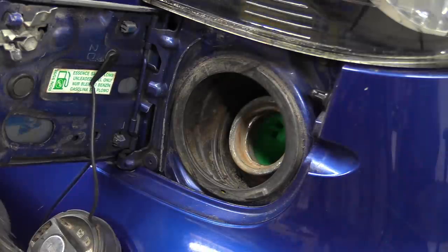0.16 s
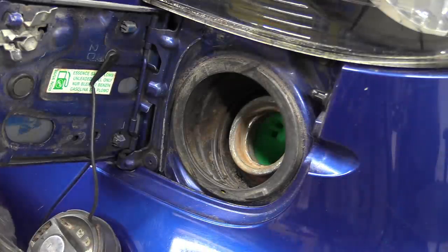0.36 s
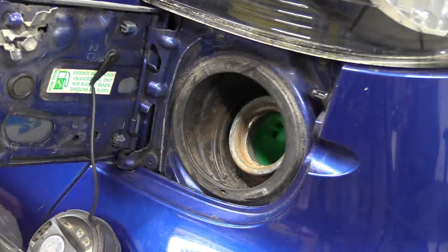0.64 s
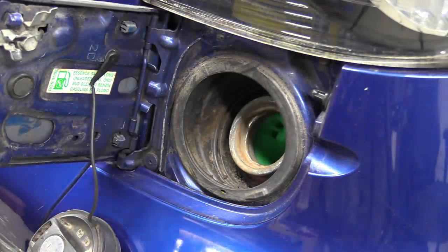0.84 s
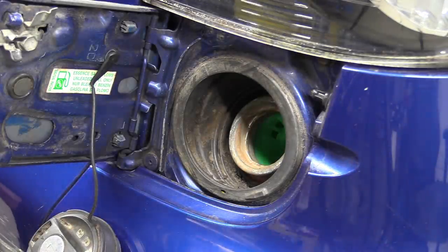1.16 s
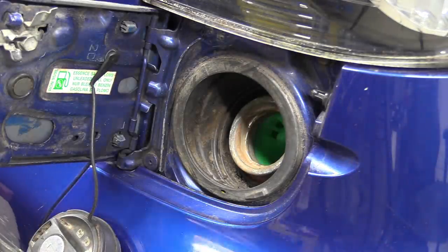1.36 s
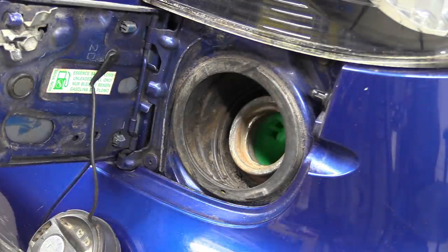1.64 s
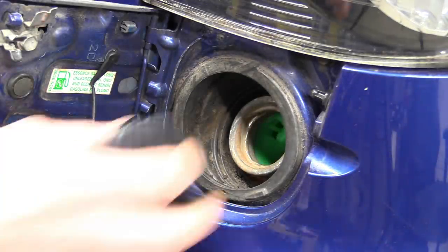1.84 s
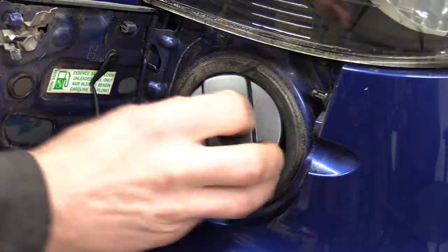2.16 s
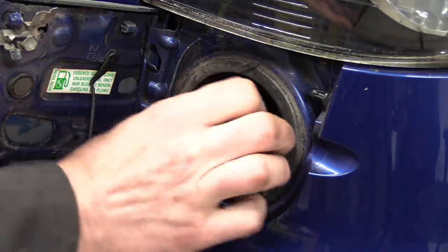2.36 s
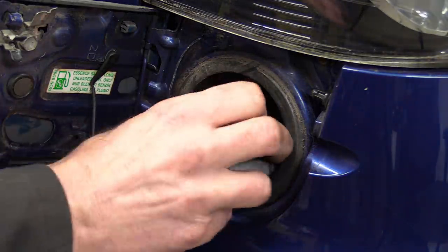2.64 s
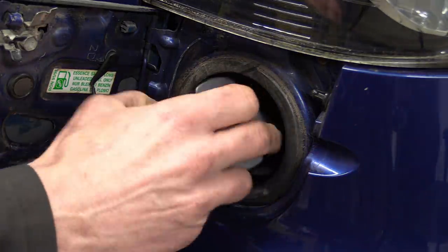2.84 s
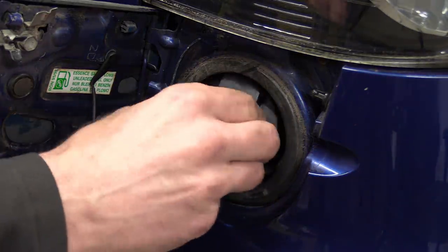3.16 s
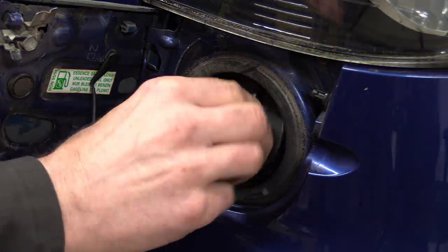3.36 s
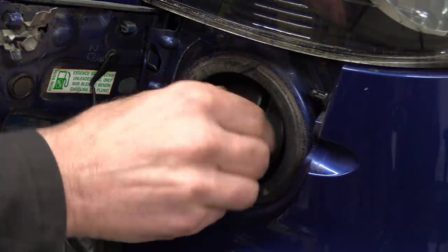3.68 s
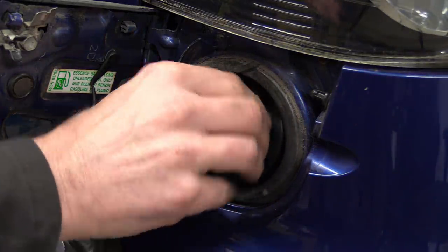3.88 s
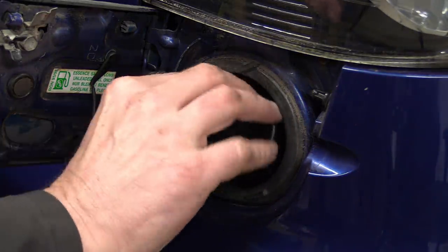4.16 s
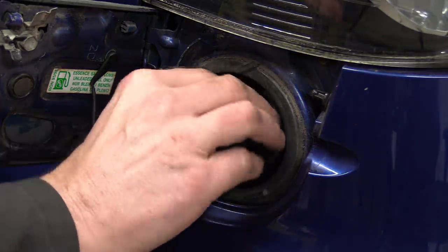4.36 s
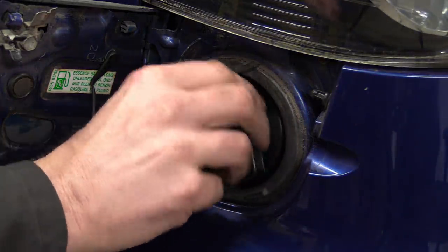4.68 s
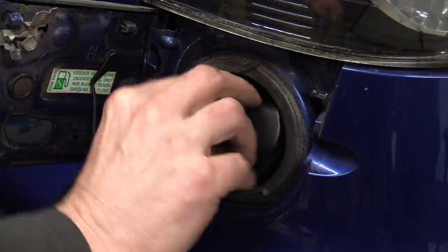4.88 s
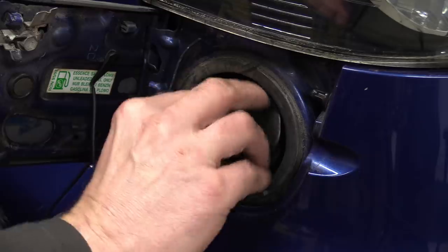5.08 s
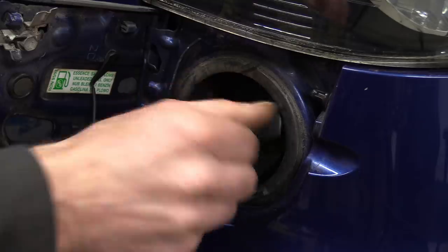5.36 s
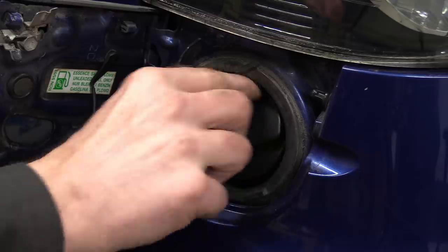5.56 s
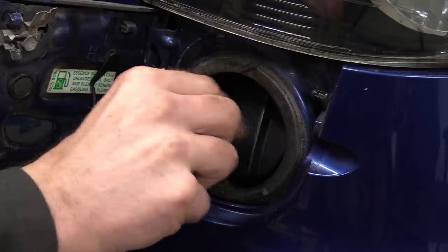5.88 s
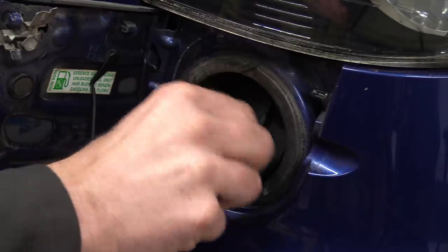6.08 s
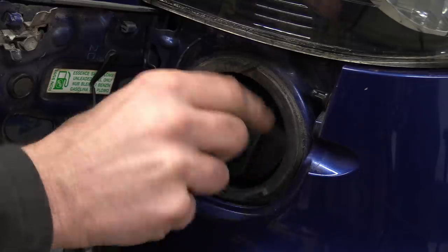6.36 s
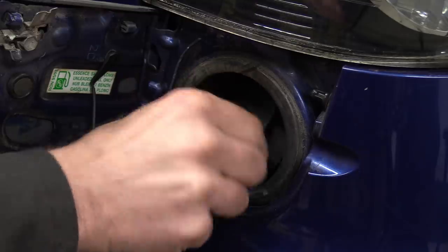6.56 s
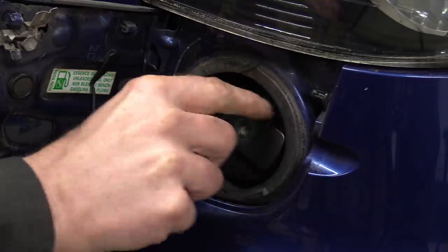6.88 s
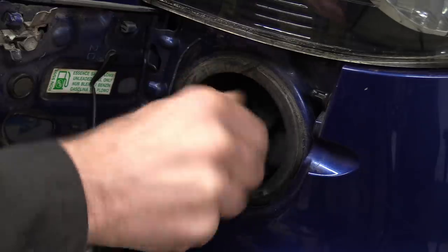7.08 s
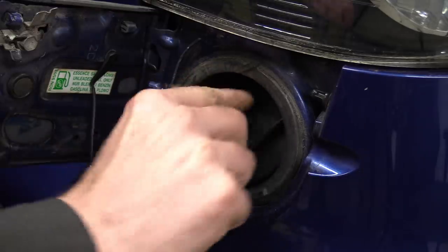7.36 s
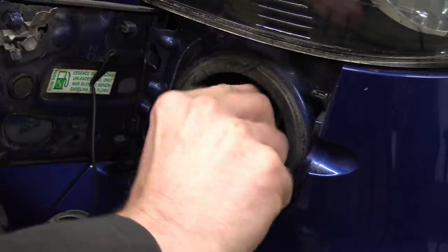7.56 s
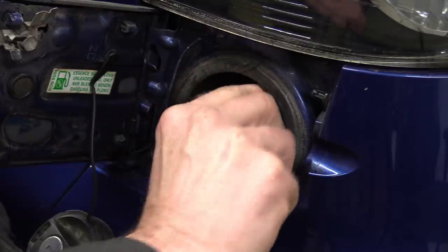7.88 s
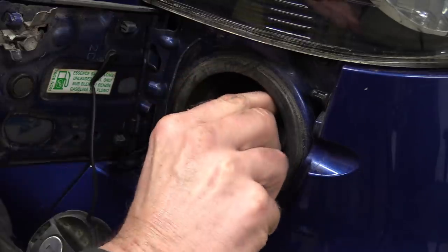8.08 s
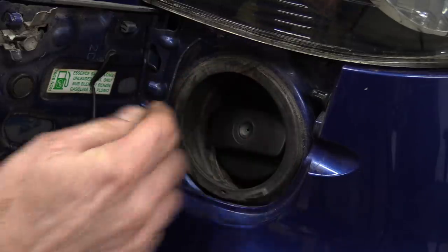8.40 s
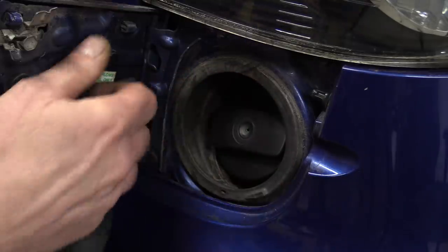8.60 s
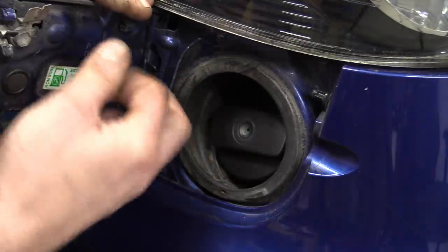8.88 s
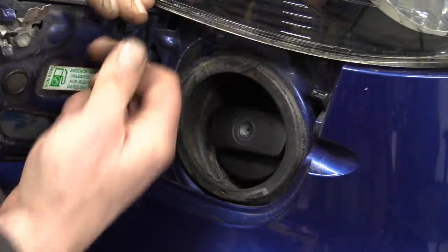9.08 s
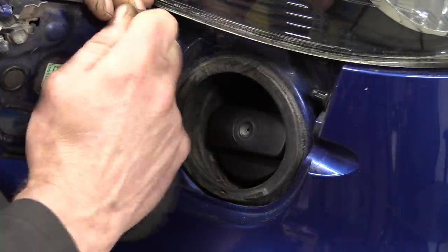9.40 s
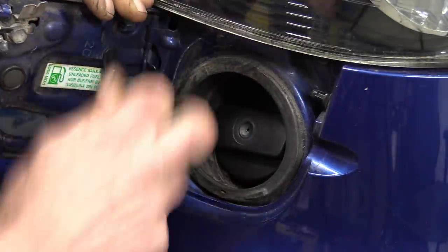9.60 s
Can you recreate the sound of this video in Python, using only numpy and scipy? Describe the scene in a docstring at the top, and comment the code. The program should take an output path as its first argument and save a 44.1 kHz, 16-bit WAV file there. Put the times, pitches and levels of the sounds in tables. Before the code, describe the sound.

In an echoing garage, an object clatters across the room, then a plastic cap knocks, grates and turns in a car's filler neck, ending with latch snaps.

```python
"""Fuel cap in a bare garage

Close to the microphone, a hand sets a plastic cap into a car's filler neck and turns it in several grips:
blows ring decaying modes, and thread and fingers rub as trains of tiny slips through surface colours.
The hand also bumps flap and body panel, the latch snaps, a sleeve swishes over the scene.
A few metres off, a hard object clatters early on, then slides, scuffs and squeaks as it settles.
Every source is heard directly and through synthetic room echoes, over quiet room noise.
"""
import sys
import numpy as np
from scipy import signal
from scipy.fft import rfft, irfft
from scipy.io import wavfile
from scipy.ndimage import uniform_filter1d, map_coordinates

SR = 44100
rng = np.random.default_rng(int(sys.argv[2]) if len(sys.argv) > 2 else 0)


def materialize(psi):
    """Save the field psi as 16-bit PCM at rate SR to the path in sys.argv[1].

    A 1-D psi becomes a single channel; in a 2-D psi each row is a channel.
    """
    bounded = np.clip(np.atleast_2d(psi).T, -1, 1)
    quanta = np.round(bounded * 32767).astype(np.int16)
    wavfile.write(sys.argv[1], SR, quanta)


N = 429534
TIME = np.arange(N) / SR

# All levels in the tables are relative: each source sets its own balance on top.
# Mode pitches and levels of cap, flap, latch and far object are nominal: each blow varies them;
# panel and room modes stay fixed.
THREAD_CATCHES_S = 3.8
GRIP_HISS_DB = -67.5  # the fingers creep a little during every turn
QUICKENING = 0.72  # a harder contact is over sooner (dB of contact time per dB of hardness)
AIR_DB = -65
TOP_HZ = 15750

# Five parts of every blow, thud, body, clack, ring and tick: low_hz, high_hz
BLOW_PARTS = [(60, 600), (600, 1850), (1850, 2750), (2750, 4500), (4500, 16000)]

# The cap knocks in the neck; a blow on its rim rings higher: start_s, level_db, hardness_db, rim_ring_db
CAP_KNOCKS = [(2.399, -26, -4, 0.5), (3.306, -30.5, -6, 2), (3.402, -36, -8.5, 2), (3.432, -39.5, 0, 0),
              (3.449, -36.5, 4.5, -10), (3.668, -41.5, 9, 4.5), (3.929, -45.5, 5, 2),
              (4.045, -41.5, 1.5, 7), (4.354, -50.5, -10, 0), (4.469, -30.5, -3.5, 1.5),
              (4.767, -47, 2.5, 3), (4.817, -46.5, 0, 7), (4.841, -48, 0, 3), (4.891, -37.5, -3, -3),
              (4.907, -51, -7, -3), (5.013, -24, -2, 5), (5.024, -38.5, -5, -12), (5.209, -42, 1, 2),
              (5.363, -29, 3.5, -5), (5.415, -37, -0.5, -7), (5.627, -26.5, 1, -0.5),
              (5.717, -25.5, 12, -3), (5.766, -20.5, 3.5, 4.5), (5.771, -31.5, 11.5, -9),
              (5.993, -47.5, 5, 7), (6.099, -43.5, -3, -2), (6.126, -26.5, 5, 1), (6.135, -30, 7, -11),
              (6.226, -21, 9.5, -1.5), (6.563, -32, 5.5, -6), (6.616, -25.5, 5.5, -5),
              (6.623, -36.5, 16, -8), (6.7, -29.5, 16.5, 2), (6.706, -32, 0.5, -17), (7.029, -36, 9, -12),
              (7.056, -36.5, 4, -4), (7.095, -43, 2, 3)]
# What the cap rings with: pitch_hz, level_db, t60_s
CAP_MODES = [(298, 1, 0.038), (374, -1.5, 0.1), (538, 5, 0.036), (739, -11.5, 0.02), (849, -3, 0.033),
             (956, 0, 0.019), (1014, 3.5, 0.013), (1270, -7.5, 0.0096), (1996, 14.5, 0.021),
             (2175, 19.5, 0.012), (2332, 9.5, 0.04), (2630, 4, 0.018), (3072, 6.5, 0.042),
             (4400, -10, 0.013), (6150, 8, 0.0073), (7140, -1, 0.01)]
# Crack of a blow on the cap: frequency_hz, density_db (per Hz)
CAP_CRACK = [(60, -35), (150, 0), (400, -1.5), (600, 3.5), (950, 22), (1600, 16), (2400, 3), (3300, -9.5),
             (5000, -17), (7400, -17.5), (9500, -24.5), (15000, -41.5)]
# The hand turns the cap, a stroke at a time: start_s, end_s, pressure_db
CAP_TURNS = [(2.677, 2.905, -54.5), (3.004, 3.05, -48), (3.169, 3.174, -48), (3.358, 3.482, -36.5),
             (3.592, 3.693, -43.5), (3.929, 3.963, -41.5), (3.999, 4.076, -42), (4.198, 4.212, -39.5),
             (4.336, 4.409, -47.5), (4.512, 4.556, -42.5), (4.885, 4.902, -29.5), (4.903, 4.976, -48),
             (4.997, 5.003, -33.5), (5.102, 5.257, -44.5), (5.241, 5.335, -38), (5.69, 5.784, -35.5),
             (6.149, 6.225, -37.5), (6.643, 6.717, -38), (7.019, 7.127, -46.5), (7.107, 7.25, -57.5)]
# The deeper the cap sits in its thread, the more a turn grates: time_s, grit_db (over the pressure)
GRATING = [(2.6, -28), (3.5, -18), (5.3, -8), (5.7, -4), (7.1, -0.5)]
# The fingers slide to a new grip: start_s, end_s, level_db
REGRIPS = [(2.08, 2.28, -65), (2.29, 2.36, -57), (2.378, 2.41, -46.5), (2.67, 2.87, -60.5),
           (2.94, 3.0, -63.5), (3.03, 3.18, -74), (3.83, 3.89, -66.5), (3.998, 4.025, -56.5),
           (4.42, 4.48, -67), (4.65, 4.76, -67.5), (5.255, 5.305, -48), (5.33, 5.41, -64),
           (6.578, 6.612, -50)]
# Dry fingertips chatter on the grip, at varied pitches: start_s, end_s, level_db, pitch_hz
FINGER_SQUEAKS = [(2.382, 2.398, -51, 1520), (2.385, 2.398, -46, 3030), (2.68, 2.87, -73, 6100),
                  (2.945, 3.0, -72, 7100), (3.14, 3.2, -79, 7100), (3.6, 3.66, -76, 7300),
                  (3.835, 3.89, -63.5, 6800), (3.998, 4.022, -47, 2000), (4.42, 4.47, -77, 7500),
                  (4.57, 4.61, -61, 3150), (4.68, 4.76, -73, 7200), (4.885, 4.903, -55.5, 5960),
                  (5.262, 5.3, -63.5, 7300), (6.113, 6.123, -60, 7100), (6.15, 6.22, -74, 7300),
                  (6.583, 6.609, -49.5, 7300), (6.64, 6.69, -83, 7450), (6.94, 6.98, -75, 8200),
                  (7.13, 7.19, -75.5, 6700)]
# Colour of the rubbing thread: frequency_hz, density_db (per Hz)
RUB_COLOUR = [(100, -21), (170, -4), (350, -2), (650, -8.5), (860, 12.5), (1020, -1), (1250, -3),
              (1600, -24.5), (2200, -34)]
# Colour of grit in the thread and under the fingers: frequency_hz, density_db (per Hz)
GRIT_COLOUR = [(780, -2), (960, 14), (1200, -0.5), (1650, 3), (1950, 6), (2150, 4), (2400, 10.5),
               (2750, -17), (3030, 3.5), (3300, -10.5), (4400, -10), (5200, -19), (7300, -16), (8600, -24),
               (11000, -27), (15000, -50)]
# Colour of fingers or any light, dry scrape: frequency_hz, density_db (per Hz)
DRY_SCRAPE_COLOUR = [(2500, -12), (3080, 16), (3800, -10), (4800, -8), (5900, 2.5), (7400, -1),
                     (9500, -7.5), (12500, -12), (15000, -30)]

# Hand and cap bump the filler housing and flap; skin is soft, nail and plastic are hard, and the middle
# of the flap sounds hollow, its rim does not: start_s, level_db, hardness_db, hollowness_db
FLAP_KNOCKS = [(2.073, -48.5, 2.5, -4.5), (2.148, -55.5, 11, 1), (2.192, -50, 3, -3.5),
               (2.21, -51, -12, 8.5), (2.245, -55, 6, -3.5), (2.675, -62, 14, -11.5), (2.885, -57, 4, -8.5),
               (6.476, -51, -5, -0.5), (7.203, -51, 0, 2), (7.467, -54, -3, 2.5), (7.496, -52.5, -11, 5),
               (7.684, -50, -1, 1), (7.863, -52, 22, -4.5), (8.588, -44.5, -4, -2.5), (8.658, -49.5, -4, 2),
               (8.955, -46, 11, 11), (9.018, -36, 6.5, 1), (9.21, -41.5, -1, -0.5), (9.222, -51, 12, 10),
               (9.246, -29, 0, -2), (9.27, -34.5, 0, 0), (9.292, -44, 3, -10), (9.334, -27.5, 2, 7),
               (9.461, -35.5, 0.5, 2), (9.491, -34.5, -3.5, 0), (9.607, -31, -7.5, 3.5), (9.667, -46, 9, 4),
               (9.683, -50, -1, 7)]
# What housing and flap ring with: pitch_hz, level_db, t60_s
FLAP_MODES = [(68, -46, 0.22), (159, -3.5, 0.063), (243, 1.5, 0.06), (398, 0.5, 0.054), (560, 6.5, 0.03),
              (720, -1, 0.0061), (950, 8, 0.018), (1380, 3, 0.026), (1620, 11, 0.025), (1718, 13.5, 0.019),
              (2125, 10, 0.023), (2955, -7, 0.02), (3700, 4, 0.011), (4525, -5, 0.023), (6270, 5, 0.012),
              (10650, 10, 0.0028)]
# Crack of flap, latch and dirt specks: frequency_hz, density_db (per Hz)
CRACK_COLOUR = [(60, -26), (150, 4.5), (400, 15), (1000, 20.5), (2500, 4), (3900, 1.5), (5000, -6.5),
                (7800, -8.5), (11000, -22), (15000, -33)]
# The flap's latch snaps and rebounds: start_s, level_db, hardness_db
LATCH_CLICKS = [(8.8965, -21.5, 0.5), (8.903, -35, -5.5), (8.9085, -49, -5), (8.913, -48, 6),
                (9.599, -26.5, 4.5), (9.612, -43, 2)]
# What the latch rings with: pitch_hz, level_db, t60_s
LATCH_MODES = [(220, -1.5, 0.039), (422, -12, 0.027), (660, -1, 0.014), (970, -1, 0.016), (1525, 2, 0.022),
               (2080, 0, 0.013), (2890, -7, 0.012), (3350, 15, 0.016), (3980, 11, 0.015), (5970, 0, 0.013),
               (7340, 3, 0.0085), (8440, -3, .01), (11280, -11, .01)]

# The soft side of the hand thumps the body panel: start_s, level_db
PANEL_THUMPS = [(2.075, -38.5), (2.194, -41), (2.221, -42), (6.477, -41), (8.26, -43), (6.935, -46.5),
                (8.575, -48), (8.697, -33), (8.718, -34), (9.025, -34), (9.24, -23.5), (9.268, -26.5)]
# What the panel rings with: pitch_hz, level_db, t60_s
PANEL_MODES = [(70, -24, 0.061), (158, -4.5, 0.053), (212.4, 11, 0.051), (366, -2.5, 0.059)]
# The hand leans and drags on the bodywork: start_s, end_s, level_db
PANEL_DRAGS = [(2.14, 2.28, -41), (2.42, 2.57, -46), (2.62, 3.15, -54), (4.88, 4.98, -39), (8.57, 8.8, -41),
               (8.93, 9.08, -35.5), (9.235, 9.305, -27), (9.36, 9.72, -42.5)]
# Colour of skin on the panel: frequency_hz, density_db (per Hz)
PANEL_COLOUR = [(35, -41), (68, -13), (95, -34), (150, 2.5), (220, 2), (380, -5), (600, -16), (1500, -16),
                (3000, -22.5)]

# The sleeve swishes with each move of the arm: start_s, end_s, level_db
SLEEVE_SWISHES = [(0, 0.3, -58), (1.45, 1.9, -59), (7.44, 7.88, -62.5), (8.27, 8.44, -50.5),
                  (8.57, 8.76, -57.5), (8.8, 8.89, -59.5), (9.19, 9.27, -44), (9.55, 9.74, -50.5)]
# Colour of sliding cloth: frequency_hz, density_db (per Hz)
CLOTH_COLOUR = [(200, -3), (600, 4), (1200, 5), (2000, 10.5), (3700, 4), (5000, -4.5), (7500, -3.5),
                (10000, -9), (15000, -21)]

# A hard object clatters across the room and settles: start_s, level_db, hardness_db
FAR_KNOCKS = [(0.719, -17.5, 4), (0.73, -29, -1), (0.742, -29, 5), (0.762, -21.5, -2.5), (0.782, -26, 5.5),
              (0.879, -29, 0), (0.908, -31.5, -6), (1.128, -43, -14), (1.153, -50, -10), (1.18, -62, -12)]
# What the far object rings with: pitch_hz, level_db, t60_s
FAR_MODES = [(300, 4.5, 0.11), (494, 15, 0.059), (810, 7, 0.027), (1100, 4.6, 0.03), (1370, 11, 0.053),
             (1720, 13, 0.065), (2165, 32, 0.036), (2450, 5.9, 0.05), (2700, 8.2, 0.058),
             (3260, 5.2, 0.053), (5330, 3, 0.031), (7300, 8.5, 0.055), (7800, 5.6, 0.058)]
# Colour of its cracks and slides: frequency_hz, density_db (per Hz)
FAR_CRACK = [(70, -39), (130, -26), (300, -7), (450, -7), (750, -4.5), (1100, -2.5), (2300, -2.5),
             (3200, -10), (4200, -18), (5200, -15), (7900, -8.5), (10000, -21), (15500, -42)]
# It slides a little: start_s, end_s, level_db
FAR_SLIDES = [(.875, .93, -43), (1.097, 1.185, -54.5), (1.29, 1.36, -65), (1.47, 1.62, -61.5),
              (1.72, 1.88, -64)]
# Its underside scuffs the floor as it comes to rest: start_s, end_s, level_db
FAR_SCUFFS = [(1.135, 1.19, -51.5), (1.205, 1.245, -54)]
# Colour of that scuff: frequency_hz, density_db (per Hz)
SCUFF_COLOUR = [(140, -7), (230, -4), (330, -7), (580, 0), (850, 5.5), (1150, -15)]
# It squeaks as it settles: start_s, end_s, level_db, pitch_hz
FAR_SQUEAKS = [(1.095, 1.122, -41, 2950), (1.128, 1.16, -47, 2310), (1.315, 1.345, -58, 2890),
               (1.325, 1.355, -58, 2460), (1.475, 1.505, -62, 3020), (1.485, 1.512, -56, 1420),
               (1.76, 1.86, -62, 3040)]

# The garage's echo: frequency_hz, t60_s, level_db, left_right_likeness (0-1), left_over_right_db
ROOM_ECHO = [(58.4, 3.7, 24, 0.93, 0.5), (112, 2.2, -1.5, 1, -12), (138, 1.8, 4.5, 1, -3),
             (345, 1.02, 7, 0.94, -5), (600, 0.87, 3, 0.53, -3), (916, 0.56, -2.5, 0.34, 0),
             (2160, 0.67, 0, 0.35, -2), (2830, 0.48, -2, 0.76, -3), (3580, 0.72, -0.5, 0, -2),
             (5000, 0.67, -2.5, 0, -4), (8100, 0.31, -1.5, 0.6, -2), (15100, 0.39, -2, 0.6, -3)]
# Its standing waves: pitch_hz, level_db, t60_s
ROOM_MODES = [(150.7, -49.5, 0.86), (225, -61, 0.6), (372.5, -48.5, 0.41), (408.2, -50.5, 0.68),
              (577.7, -60.5, 0.5), (820, -59.5, 0.32), (897, -60.5, 0.15), (959, -58.5, 0.34),
              (1086, -55, 0.29)]
# Colour of the room noise: frequency_hz, density_db (per Hz)
AIR_COLOUR = [(15, -33), (25, -21), (153, 5.5), (575, 1), (1290, 0), (1440, 0), (1610, -3.5), (1840, -6),
              (2000, 1.5), (3720, -6), (4030, -8), (6380, -11.5), (9070, -13), (9840, -14.5), (16000, -25)]


def cap():
    """The cap knocks in the neck; each turn rubs and grates the thread, and the fingers slide on the grip."""
    blows = knocks(
        CAP_KNOCKS, CAP_MODES, CAP_CRACK, trims_db=[-16.0, 0.5, -11.5, -19, -27.5],
        tilts=[(-1.48, -0.27), (-0.29, -0.083), (0.65, -0.23), (0.49, 0.93), (-0.15, 0.13)],
        cracks_db=[2.0, -6.5, -3.5, -5, 1.0], crack_t60=0.036, rise_s=0.0023, detune=0.029,
        stiffen_per_s=0.012)
    blows = low_cut(blows, hz=105.5, order=4)

    # once the thread has caught, the cap slides for a moment before it strikes
    slides_in = [(s - .012, s, db) for s, db, *_ in CAP_KNOCKS if s > THREAD_CATCHES_S]
    run_up = strokes(slides_in, edge_s=0.0042)
    thread = friction(RUB_COLOUR, slips_per_s=2000, spread_db=1.5, flutter_db=3.0)
    thread = wander(thread, share=0.05, size=1200)
    rub = thread * (strokes(CAP_TURNS, edge_s=0.02) + undb(-14.5) * run_up)

    regripping = strokes(REGRIPS, edge_s=0.063)
    grating = strokes(CAP_TURNS, edge_s=0.018) * undb(np.interp(TIME, *np.transpose(GRATING)))
    grains = friction(GRIT_COLOUR, slips_per_s=2200, spread_db=2, flutter_db=2.5)
    grains = wander(grains, share=0.06, size=900)
    grit = grains * (grating + undb(1.5) * regripping)

    skin = friction(DRY_SCRAPE_COLOUR, slips_per_s=3000, spread_db=3, flutter_db=3)
    creeping = strokes([(start, end, GRIP_HISS_DB) for start, end, _ in CAP_TURNS], edge_s=0.012)
    finger_motion = np.maximum(regripping, creeping)
    # specks of dirt crackle under the thread and fingers
    specks = friction(CRACK_COLOUR, slips_per_s=110, spread_db=2, flutter_db=0) * finger_motion
    chatter = squeaks(FINGER_SQUEAKS, sharpness=7.0, flutter_db=4.0, edge_s=0.011)
    return blows + undb(-3.0) * rub + grit + skin * finger_motion + undb(-5.5) * specks + chatter


def flap():
    """Bumps ring the housing and the hollow flap; spot and hardness change the balance of each blow."""
    blows = knocks(
        FLAP_KNOCKS, FLAP_MODES, CRACK_COLOUR, trims_db=[-1.5, 1.0, -4.0, -8, -14.0],
        tilts=[(-0.57, -1.65), (0.12, 0.77), (0.58, -0.073), (0.6, -0.3), (0.97, -0.3)],
        cracks_db=[11.0, 3.2, 1.2, 7.4, 2.5], crack_t60=0.022, rise_s=0.0016, detune=0.03)
    return low_cut(blows, hz=74, order=5)


def latch():
    """The sprung latch snaps with a bright, metallic ring."""
    clicks = knocks(
        LATCH_CLICKS, LATCH_MODES, CRACK_COLOUR, trims_db=[-9.5, -7.5, -5.5, -5.0, -13.5],
        tilts=[-0.29, -1.9, -1.1, 0.03, 1.0],
        cracks_db=[1.4, 3.4, 13, 5, 5], crack_t60=0.019, rise_s=0.0027, detune=0.017)
    return low_cut(clicks, hz=109, order=3)


def panel(push_s=0.0018):
    """Skin drags on the body panel and thumps it softly, so that only its low modes ring."""
    t = np.arange(SR // 4) / SR
    ring = sum(undb(db) * np.sin(2 * np.pi * hz * t) * fade(t, t60) for hz, db, t60 in PANEL_MODES)
    soft_ring = ring * (1 - np.exp(-(t / push_s) ** 2))
    pushes = np.zeros(N)
    for start, level_db in PANEL_THUMPS:
        pushes[int(start * SR)] = undb(level_db)
    thumps = signal.fftconvolve(pushes, soft_ring)[:N]
    skin = friction(PANEL_COLOUR, slips_per_s=400, spread_db=3, flutter_db=2)
    drags = skin * strokes(PANEL_DRAGS, edge_s=0.11)
    return low_cut(undb(-4.5) * thumps + undb(-10.0) * drags, hz=69.4, order=4)


def sleeve():
    """Cloth fibres slide over each other in a dense train of slips."""
    fibres = friction(CLOTH_COLOUR, slips_per_s=12000, spread_db=2, flutter_db=1)
    return undb(-4.0) * fibres * strokes(SLEEVE_SWISHES, edge_s=0.087)


def clatter():
    """A hard object rattles to rest some way off, then slides, scuffs and squeaks as it shifts."""
    blows = knocks(
        FAR_KNOCKS, FAR_MODES, FAR_CRACK, trims_db=[-16.5, -0.5, -1.5, -7, -13.0],
        tilts=[-0.74, 0.25, 0.9, 0.52, 1.0],
        cracks_db=[20, 22, 8.5, 25, 17], crack_t60=0.043, rise_s=0.00079, detune=0.043)
    blows = low_cut(blows, hz=135, order=4)  # a small object radiates no bass
    squeal = squeaks(FAR_SQUEAKS, sharpness=13, flutter_db=2.5, edge_s=0.0056)
    slides = friction(FAR_CRACK, slips_per_s=5100, spread_db=2, flutter_db=2)
    slides = slides * strokes(FAR_SLIDES, edge_s=0.01)
    scraping = friction(DRY_SCRAPE_COLOUR, slips_per_s=4100, spread_db=2, flutter_db=1.5)
    scraping = scraping * strokes(FAR_SLIDES, edge_s=0.006)
    scuffs = friction(SCUFF_COLOUR, slips_per_s=900, spread_db=4, flutter_db=6.5)
    scuffs = scuffs * strokes(FAR_SCUFFS, edge_s=0.02)
    return blows + squeal + slides + undb(-3.5) * scraping + scuffs


def knocks(table, modes, crack_points, trims_db, tilts, cracks_db, crack_t60, rise_s, detune,
           stiffen_per_s=0):
    """Each blow rings the modes and adds a short crack; grip and spot shift and weight the modes anew.

    The kind of contact shifts strength between the five parts, by tilts in dB per dB.
    A thing that is being tightened rings a little higher with every second (stiffen_per_s, a share).
    """
    t = np.arange(SR // 4) / SR
    attack = t < .01  # each part is levelled over its first 10 ms
    out = np.zeros(N + len(t))
    hz, db, t60 = np.transpose(modes)
    midway = np.mean([row[0] for row in table])
    for start, level_db, *touch in table:
        contact_s = rise_s * undb(-QUICKENING * touch[0])
        contact = 1 - np.exp(-(t / contact_s) ** 2)  # the surface yields before it pushes back
        pitch = hz * (1 + stiffen_per_s * (start - midway) + detune * rng.standard_normal(len(hz)))
        weight = undb(db + 2 * rng.standard_normal(len(hz))) * rng.choice([-1, 1], len(hz))
        rings = weight[:, None] * np.sin(2 * np.pi * pitch[:, None] * t) * fade(t, t60[:, None])
        grit = colour(rng.standard_normal(len(t)), crack_points)
        i = int(start * SR)
        for (lo, hi), trim_db, tilt, crack_db in zip(BLOW_PARTS, trims_db, tilts, cracks_db):
            ring = unit(rings[(hz >= lo) & (hz < hi)].sum(axis=0) * contact)
            crack = unit(band(grit, lo, hi) * fade(t, crack_t60) * contact)
            blow = ring + undb(crack_db) * crack
            gain = undb(level_db + trim_db + np.dot(tilt, touch))
            out[i:i + len(t)] += gain * blow / np.std(blow[attack])
    return out[:N]


def friction(points, slips_per_s, spread_db, flutter_db):
    """Tiny slips of uneven size, coming in fits and starts, ring a surface."""
    happens = rng.random(N) < slips_per_s / SR
    slips = happens * rng.standard_normal(N) * undb(spread_db * rng.standard_normal(N))
    return colour(slips * undb(flutter_db * slow_noise(500)), points)


def squeaks(table, sharpness, flutter_db, edge_s):
    """Stick and slip feed one narrow resonance for each row (start_s, end_s, level_db, pitch_hz)."""
    fits = slow_noise(150)
    slips = rng.standard_normal(N) * undb(flutter_db * fits)
    out = np.zeros(N)
    for row in table:
        b, a = signal.iirpeak(row[3], sharpness, fs=SR)
        tone = signal.lfilter(b, a, signal.lfilter(b, a, slips))
        out += unit(tone) * strokes([row], edge_s)
    return out


def wander(x, share, size):
    """The point of contact travels, so the resonances in x drift up and down by a share of their pitch."""
    drift = slow_noise(size)
    return map_coordinates(x, [np.cumsum(1 + share * drift)], mode="mirror")


def strokes(table, edge_s):
    """Gain of a row of sliding strokes (start_s, end_s, level_db), swelling and dying over edge_s."""
    gain = np.zeros(N)
    for start, end, db, *_ in table:
        inside = np.clip(np.minimum(TIME - start, end - TIME) / edge_s + .5, 0, 1)
        gain = np.maximum(gain, undb(db) * inside)
    return gain


def slow_noise(size):
    """Noise smoothed twice over size samples, rms 1."""
    return unit(uniform_filter1d(uniform_filter1d(rng.standard_normal(N), size=size), size=size))


def undb(db):
    """Decibels to gain."""
    return 10 ** (np.asarray(db) / 20)


def unit(x):
    """Scale to rms 1."""
    return x / np.sqrt(np.mean(x ** 2))


def fade(t, t60):
    """Exponential decay, 60 dB down after t60."""
    return np.exp(-np.log(1000) * t / t60)


def colour(x, points):
    """Filter x by (Hz, dB) points, falling a further 18 dB an octave beyond the ends; rms 1."""
    hz, db = np.transpose(points)
    bins = np.maximum(np.fft.rfftfreq(x.shape[-1], 1 / SR), 1)
    skirts = np.minimum(1, np.minimum(bins / hz[0], hz[-1] / bins)) ** 3
    curve = undb(np.interp(np.log(bins), np.log(hz), db))
    return unit(irfft(rfft(x) * skirts * curve, x.shape[-1]))


def band(x, lo, hi):
    """Keep the range lo-hi in Hz."""
    bins = np.fft.rfftfreq(x.shape[-1], 1 / SR)
    return irfft(rfft(x) * ((bins >= lo) & (bins < hi)), x.shape[-1])


def low_cut(x, hz, order):
    """High-pass filter that thins the bass below hz."""
    return signal.sosfilt(signal.butter(order, hz, "high", fs=SR, output="sos"), x)


def garage(build_s, early_db, early_t60):
    """Left and right echo: strong early returns off the car, a diffuse tail, a few standing waves."""
    t = np.arange(SR) / SR
    hz, *columns = np.transpose(ROOM_ECHO)
    edges = np.geomspace(35, 17000, 25)
    mid, side = rng.standard_normal((2, len(t)))
    out = np.zeros((2, len(t)))
    for lo, hi in zip(edges, edges[1:]):
        centre = np.log(lo * hi) / 2  # log of the band's middle
        t60, db, alike, lean_db = (np.interp(centre, np.log(hz), c) for c in columns)
        alike = np.clip(alike, 0, 1)
        decay = fade(t, t60) + undb(early_db) * fade(t, early_t60)
        shape = (1 - np.exp(-(t / build_s) ** 2)) * decay
        both, apart = (unit(band(noise, lo, hi) * shape) for noise in (mid, side))
        pair = np.sqrt(1 + alike) * both + np.sqrt(1 - alike) * np.array([apart, -apart])
        lean = np.array([[lean_db], [-lean_db]]) / 2
        out += undb(db + lean) * pair * np.sqrt((hi - lo) / SR / len(t))
    waves = sum(undb(db) * np.sin(2 * np.pi * f * t) * fade(t, t60) for f, db, t60 in ROOM_MODES)
    return out + waves


def place(x, direct_db, room_db, pan_db):
    """A source heard directly and by way of the room; pan_db is left over right."""
    room = garage(build_s=0.00096, early_db=1.0, early_t60=0.19)
    echo = signal.fftconvolve(x[None], room, axes=1)[:, :N]
    sides = undb(np.array([[pan_db], [-pan_db]]) / 2)
    return sides * (undb(direct_db) * x + undb(room_db) * echo)


def air(side_db=-7):
    """Quiet steady room noise; the bass is alike on both sides."""
    mid, side = colour(rng.standard_normal((2, N)), AIR_COLOUR)
    side = undb(side_db) * band(side, 180, SR / 2)
    return undb(AIR_DB) * np.array([mid + side, mid - side])


def scene():
    """Near and far sources share one room, but each spot in it has its own pattern of echoes."""
    sources = [place(cap(), direct_db=1.0, room_db=-0.86, pan_db=1.54),
               place(flap(), direct_db=-2.5, room_db=-2.5, pan_db=1.7),
               place(latch(), direct_db=-0.5, room_db=-2.5, pan_db=2.5),
               place(panel(), direct_db=1.0, room_db=-10.5, pan_db=-0.5),
               place(sleeve(), direct_db=0.0, room_db=2.0, pan_db=5.0),
               place(clatter(), direct_db=-8.5, room_db=0.0, pan_db=2.5)]
    return sum(sources) + air()


def record(dry):
    """The microphone thins the deep bass and the recorder cuts the top steeply."""
    top_cut = signal.ellip(8, .2, 70, TOP_HZ, fs=SR, output="sos")
    return signal.sosfilt(top_cut, low_cut(dry, hz=54.5, order=2))


dry = scene()
out = record(dry)
materialize(out)
```